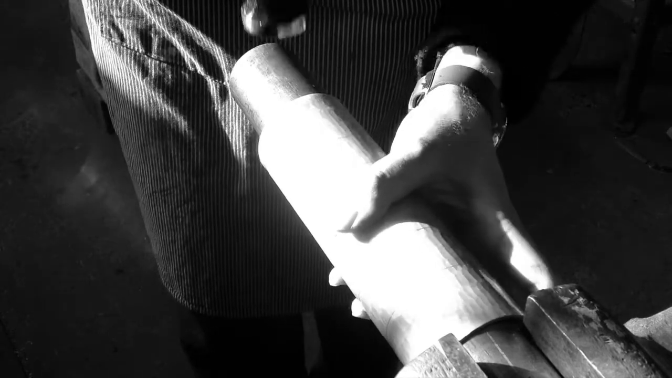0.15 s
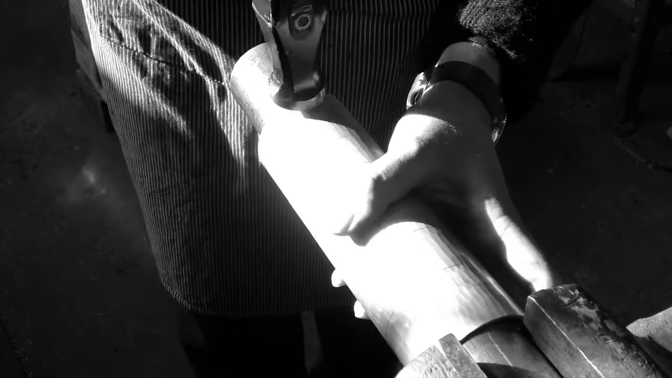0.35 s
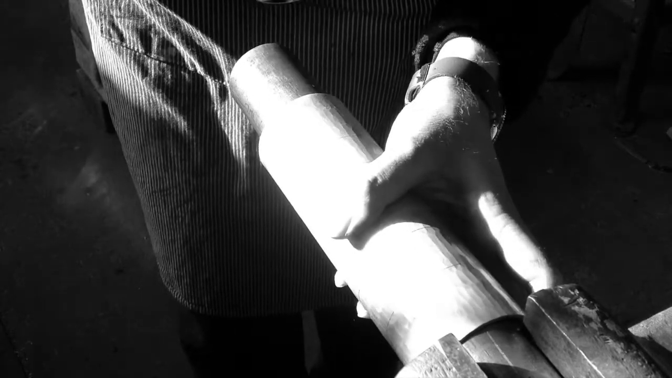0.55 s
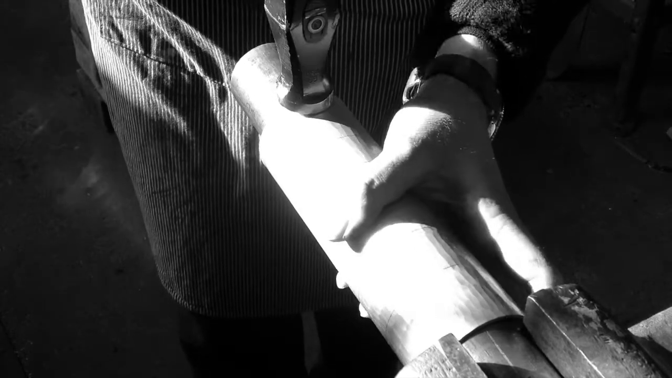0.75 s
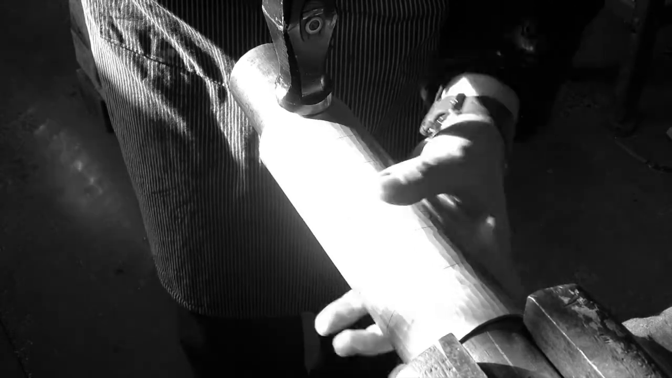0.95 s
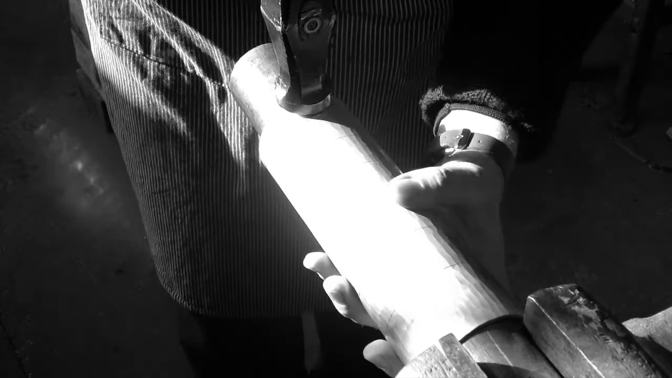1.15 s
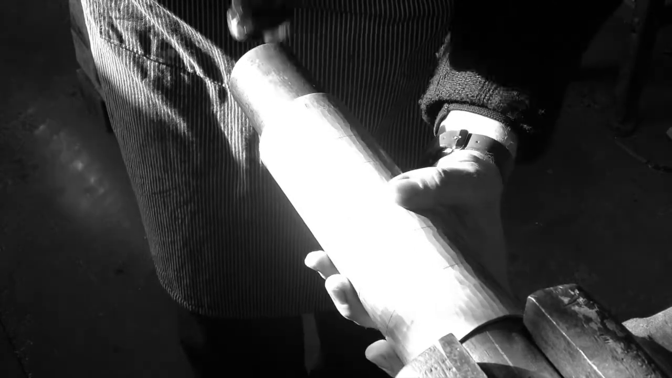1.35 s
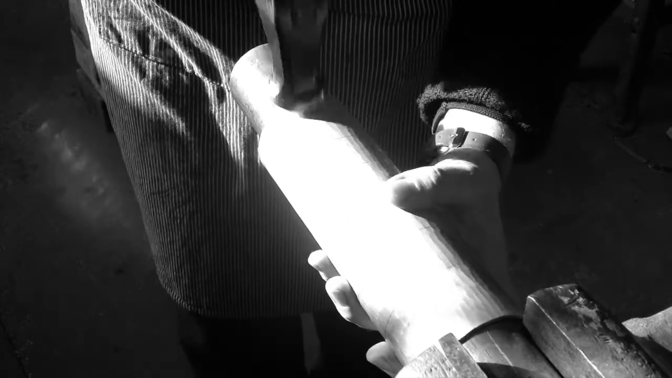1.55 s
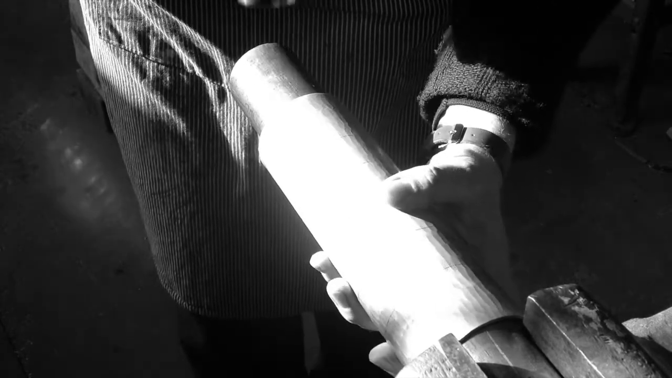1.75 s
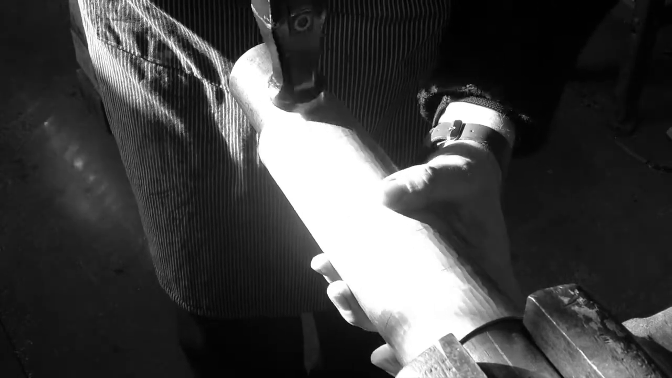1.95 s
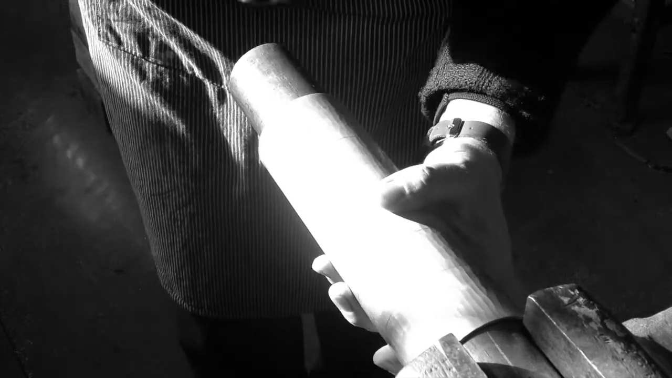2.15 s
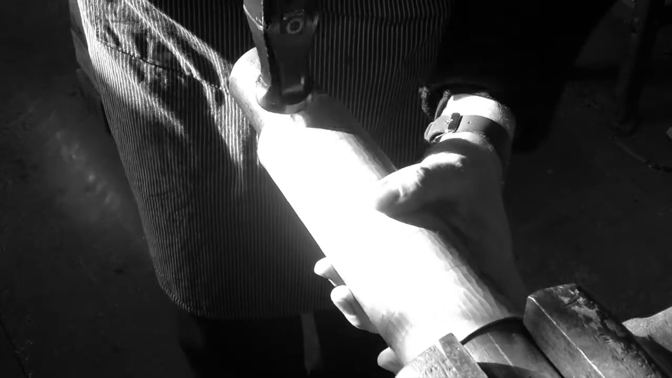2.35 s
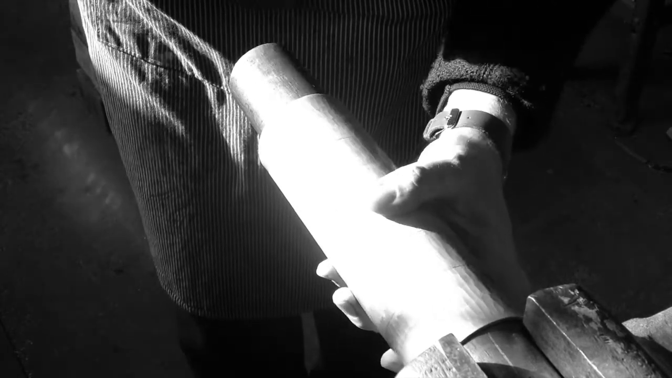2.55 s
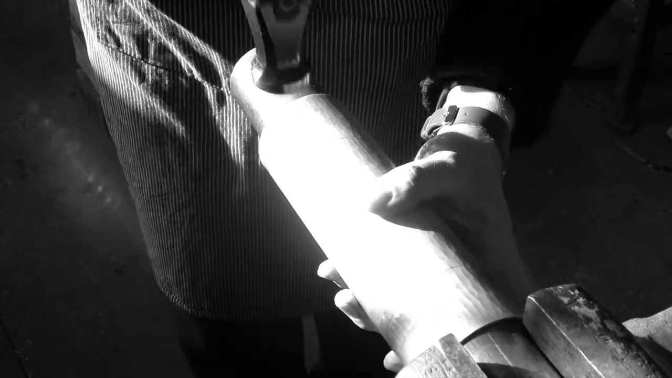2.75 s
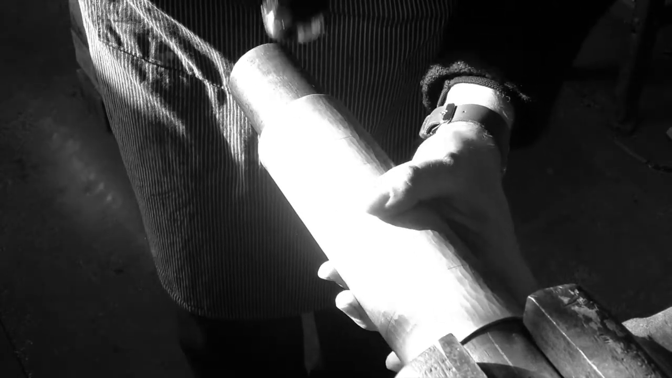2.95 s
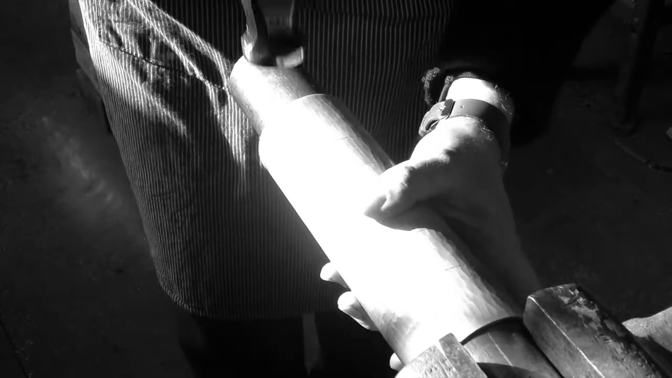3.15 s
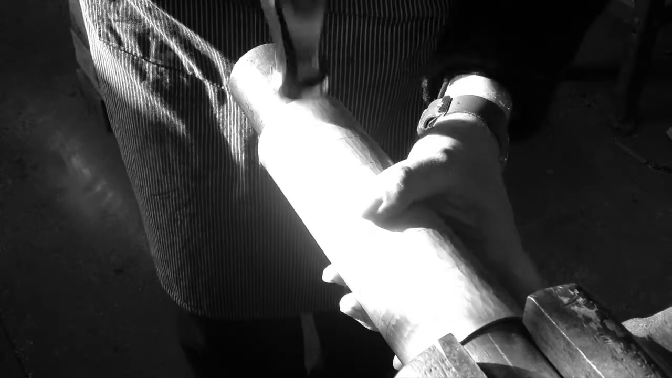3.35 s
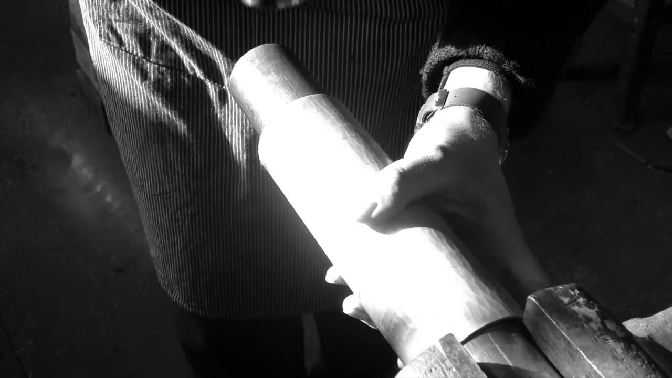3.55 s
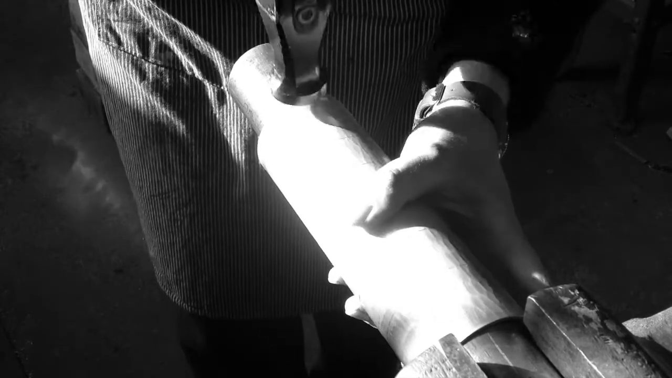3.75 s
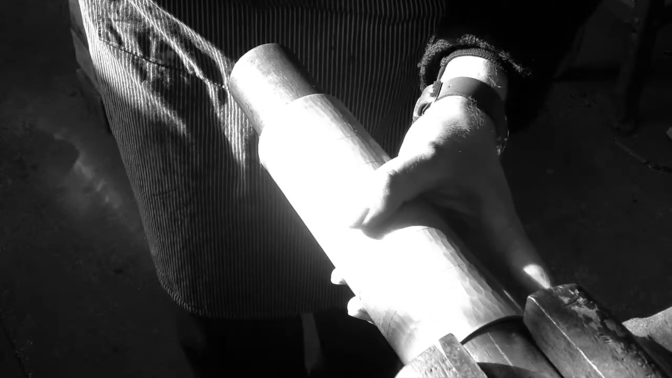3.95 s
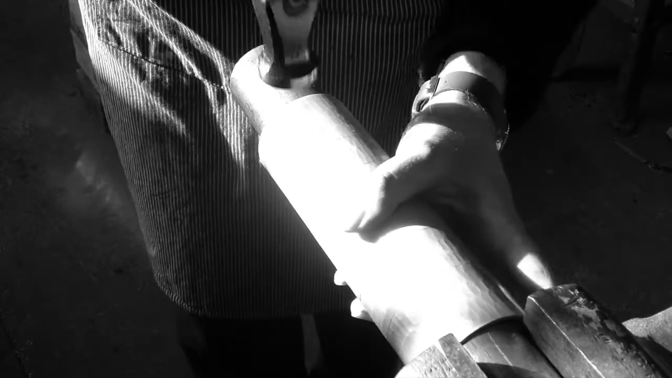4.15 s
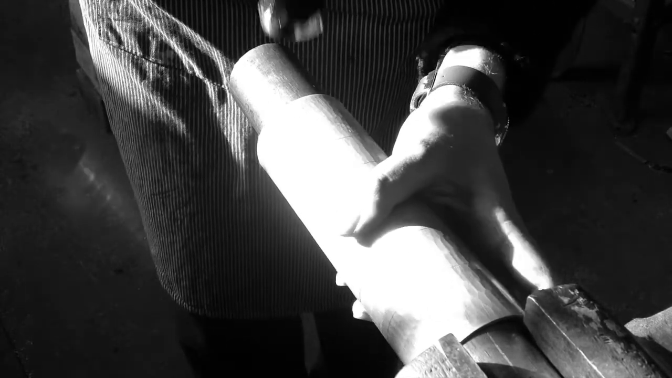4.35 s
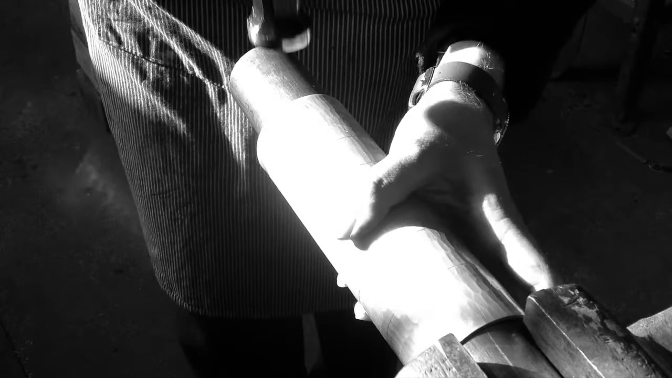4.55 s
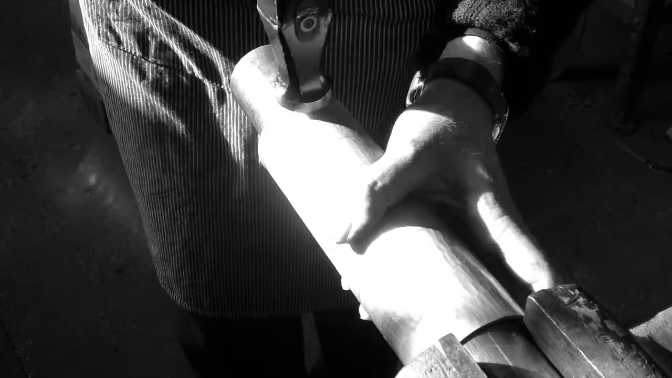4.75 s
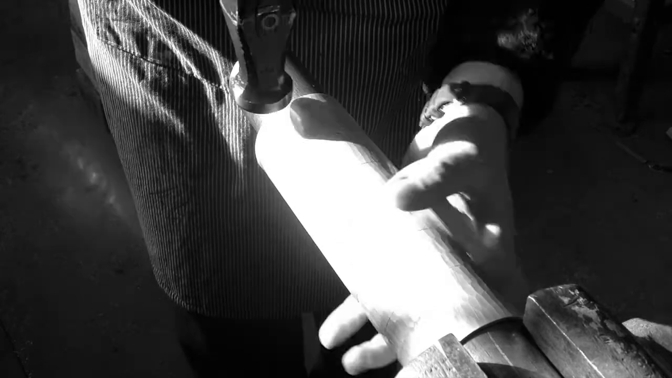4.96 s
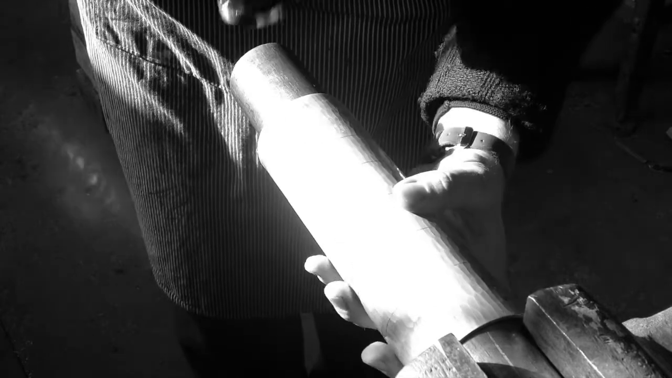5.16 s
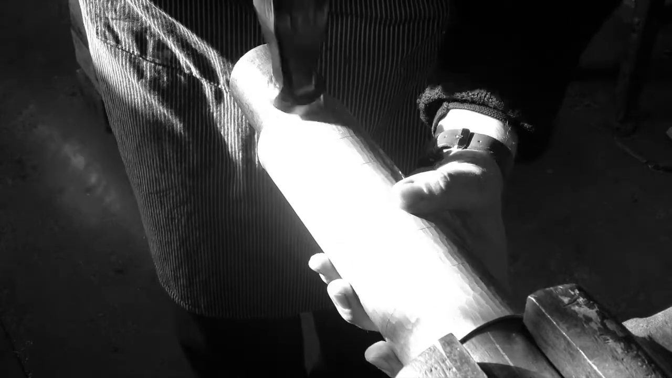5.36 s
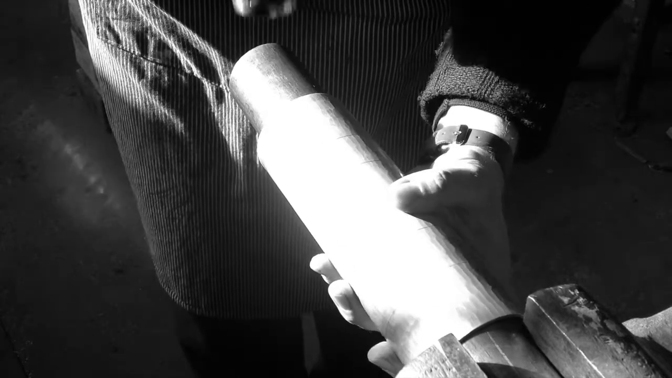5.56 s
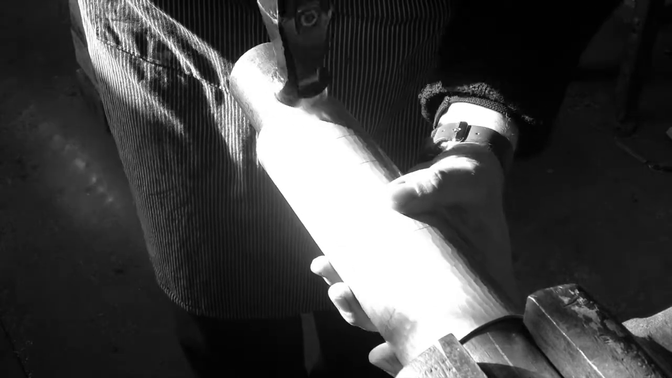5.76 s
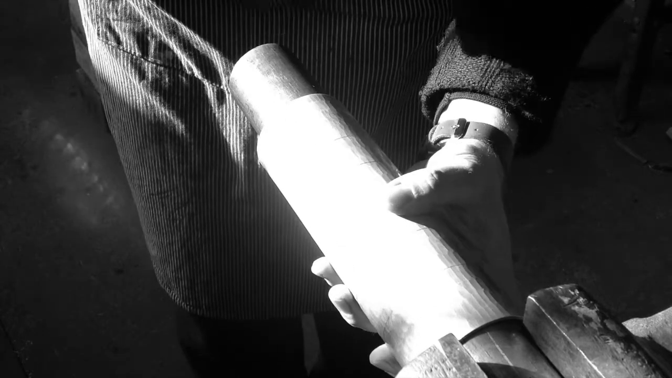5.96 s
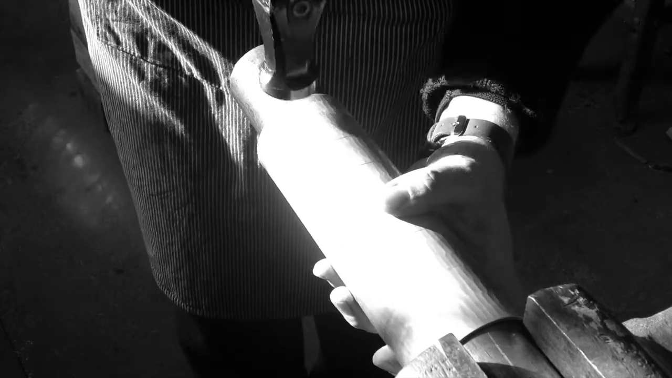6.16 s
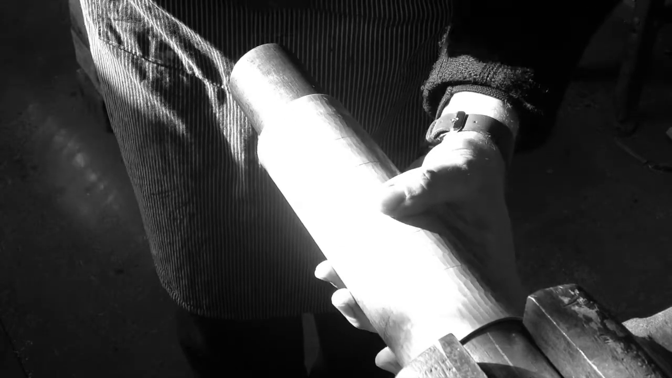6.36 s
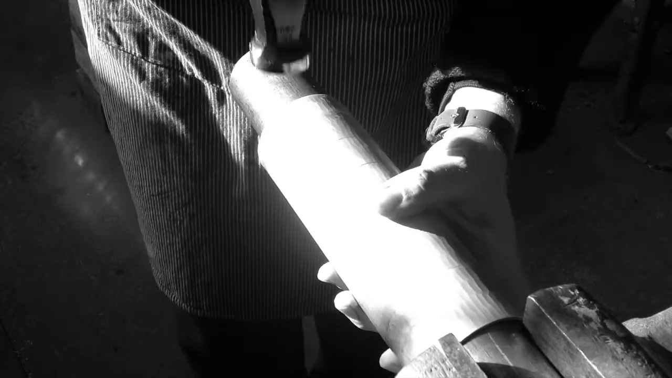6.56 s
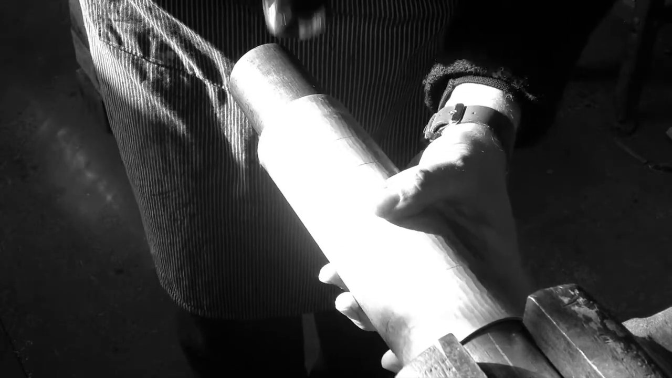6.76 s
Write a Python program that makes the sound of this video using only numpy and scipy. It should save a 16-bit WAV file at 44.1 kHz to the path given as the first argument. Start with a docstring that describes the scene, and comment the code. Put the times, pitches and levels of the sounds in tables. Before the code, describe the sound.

In a small workshop, a smith hits sheet copper against steel in an even rhythm. Three blows, a pause of nearly a second with a soft knock, a long run of ten blows, a shorter pause with faint dull bumps, then five more. The microphone is near; blows are hard, bright and slightly compressed, with short room echoes and a beating metallic ring.

```python
"""Hammering a copper vase

A smith raises the neck of a copper vase over a steel stake, nearly three blows a second, in a small workshop.
Each blow is a crack of shaped noise, a thud of one filtered push, and a clang and ring of dying sine waves.
Twice the hammering pauses while the hand turns the vase, which knocks softly on the stake.
Echoes made of shaped noise answer every contact, and a faint hiss of room air lies under it all."""
import sys
import numpy as np
from scipy import signal
from scipy.fft import rfft, irfft, next_fast_len
from scipy.io import wavfile

SR = 44100
rng = np.random.default_rng(int(sys.argv[2]) if len(sys.argv) > 2 else 0)


def generate_wav(signal):
    """Clip the signal to [-1, 1] and save it as 16-bit WAV at the path in sys.argv[1]."""
    frames = np.transpose(np.atleast_2d(signal))
    scaled = np.clip(frames, -1, 1) * 32767
    pcm = np.round(scaled).astype(np.int16)
    wavfile.write(sys.argv[1], SR, pcm)


N = 303849  # length in samples


def undb(db):
    """Turn decibels into a gain."""
    return 10 ** (np.asarray(db) / 20)


def fade(t, t60):
    """Die away exponentially, 60 dB down after t60 seconds."""
    return np.exp(-np.log(1000) * t / t60)


def colour(x, points):
    """Shape the spectrum of x by (Hz, dB) points without any sound ahead of time, so attacks stay sharp."""
    size = next_fast_len(len(x) + SR // 10, real=True) * 2
    hz, db = np.transpose(points)[:2]
    bins = np.fft.rfftfreq(size, 1 / SR)
    gain_db = np.interp(np.log(bins + 1), np.log(hz), db)
    # folding the cepstrum (the spectrum of the log gain) gives a minimum-phase filter
    cepstrum = irfft(np.log(undb(gain_db)))
    cepstrum[1:size // 2] *= 2
    cepstrum[size // 2 + 1:] = 0
    response = np.exp(rfft(cepstrum))
    return irfft(rfft(x, size) * response)[:len(x)]


def lowpass(x, hz, order=2):
    """Smoothly remove what lies above hz."""
    sos = signal.butter(order, min(hz, SR / 2 - 1), fs=SR, output="sos")
    return signal.sosfilt(sos, x)


def add(track, s, sound):
    """Mix a sound into the track at time s in seconds."""
    start = max(int(s * SR), 0)
    part = sound[:len(track) - start]
    track[start:start + len(part)] += part


def air():
    """Still air of the workshop: faint noise that swells a little at random."""
    # Tone of the air. Each row: frequency in Hz, gain in dB.
    air_tone = [(25, -80), (70, -86), (130, -58.5), (200, -55), (400, -59.5), (1000, -61), (2500, -69.5),
                (5000, -74), (10000, -75), (15000, -88)]
    swell = np.interp(np.arange(N), np.linspace(0, N, 30), rng.standard_normal(30))
    return colour(rng.standard_normal(N), air_tone) * undb(.8 * swell)


def crackle(t, hold, t60):
    """Crack of the sheet: modes too dense to tell apart, driven during the contact, then dying fast."""
    # Dense upper modes of the copper sheet. Each row: frequency in Hz, gain in dB.
    crack_tone = [(40, -59), (100, -37), (200, -16.5), (300, -21), (750, -16), (1050, -17.5), (1450, -14.5),
                  (1850, -13.5), (2600, -8.5), (3200, -14.5), (4500, -9.5), (5900, -9.5), (6700, -13.5),
                  (7400, -7), (8200, -13), (12000, -14), (12600, -18), (15000, -20)]
    envelope = np.clip(t / 0.00014, 0, 1) * fade(np.maximum(t - hold, 0), t60)
    size = SR // 8
    spectrum = rfft(rng.standard_normal(size) * envelope[:size])
    # make all frequencies equally strong, keeping only their random timing
    even = irfft(spectrum / np.abs(spectrum), size) * np.sqrt(np.sum(envelope ** 2))
    onset = np.clip(t[:size] / 0.00034, 0, 1)
    closing = np.clip((.07 - t[:size]) / 0.096, 0, 1)  # silent from 0.07 s on
    return np.pad(colour(even * onset * closing, crack_tone), (0, len(t) - size))


def push_thud(t, thud_db):
    """Thud: the blow's momentum goes into the stake as a single push, a filtered impulse."""
    # Dull push through the stake, before the bass change below. Each row: frequency in Hz, gain in dB.
    thud_tone = [(25, -32), (60, -22), (100, -5.5), (150, 10), (230, 8.5), (400, 2), (800, -23.5),
                 (3000, -53)]
    deep_hz = 120  # deep bass lies below this
    deep_db = -3 + 0.71 * thud_db  # the harder the thud, the more deep bass it carries
    push = [(hz, db + deep_db * (hz < deep_hz)) for hz, db in thud_tone]
    thud = np.zeros(len(t))
    add(thud, 0, undb(thud_db) * colour(signal.unit_impulse(SR // 20), push))
    return thud


def modes(table, t, detune, scatter_db):
    """Decaying sines; each blow lands on a new spot, which shifts their pitch and strength."""
    out = np.zeros(len(t))
    draws = rng.standard_normal((len(table), 3))
    for (hz, db, t60), (shift, size, phase) in zip(table, draws):
        u = t[:int(2 * t60 * SR)]
        cycles = hz * (1 + detune * shift) * u + phase
        level = undb(db + scatter_db * size)
        out[:len(u)] += level * fade(u, t60) * np.sin(2 * np.pi * cycles)
    return out


def wall_clang(t, ping_db):
    """Clang: quickly damped modes of the copper wall and the hammer head."""
    # Modes of wall and hammer, before ping and scatter.
    # Each row: frequency in Hz, level in dB, time to fall 60 dB in seconds.
    clang_modes = [(394.5, -39, 0.22), (703, -36, 0.11), (792.4, -39, 0.16), (869, -45.5, 0.1),
                   (1346.7, -27, .09), (2340, -27, 0.073), (2639, -29.5, 0.053), (3905, -24, 0.095),
                   (4988, -16, 0.051), (5126, -29, 0.057), (5450, -35.5, .06), (6070, -22.5, 0.041)]
    # the spot struck matters mostly for the bright ping near 5 kHz
    wall = [(hz, db + ping_db * (4900 < hz < 5100), t60) for hz, db, t60 in clang_modes]
    return modes(wall, t, detune=.005, scatter_db=1.5)


def stake_ring(t, ring_db, free_db, whistle_db, stretch):
    """Ring: long modes of the steel stake with the vase on it, close pairs beating."""
    # Modes of stake and vase, before the changes below.
    # Each row: frequency in Hz, level in dB, time to fall 60 dB in seconds.
    ring_modes = [(2292, -44, .35), (2316, -39, .45), (3671, -62, .9), (4000, -30, .26), (4013, -43, .55),
                  (4023, -41, .55), (6182, -38, .33), (6202, -31.5, .38), (6944, -63, .8), (7564, -37, .52),
                  (7588, -41, .25), (9540, -52, .52), (10070, -51, .22), (10982, -65, 1.7),
                  (11654, -41, .47), (11668, -45, .3)]
    hz, db, t60 = np.transpose(ring_modes)
    # where the copper sits loosely on the steel, the bell-like modes near 7.6 kHz ring louder and longer
    loose = undb(.35 * free_db * (abs(hz - 7570) < 100))
    whistle = whistle_db * (abs(hz - 10982) < 100)
    held = np.where(hz > 10500, stretch, 1)  # only the highest modes are stretched
    steel = np.transpose([hz, db + 20 * np.log10(loose) + whistle, t60 * loose * held])
    return undb(ring_db) * modes(steel, t, detune=.00015, scatter_db=2.2)


def strike(thud_db, ping_db, ring_db, bright_db, free_db, whistle_db, stretch=1):
    """One contact with the vase: its broad crack, its thud, its short clang and its long ring."""
    t = np.arange(SR) / SR
    crack = crackle(t, hold=0.0034, t60=0.047)  # both in seconds
    treble = crack - lowpass(crack, 9400, order=1)
    crack = crack + (undb(bright_db) - 1) * treble
    thud = push_thud(t, thud_db)
    clang = wall_clang(t, ping_db)
    ring = stake_ring(t, ring_db, free_db, whistle_db, stretch)
    return crack, thud, clang, ring


def blow(s, thud_db, ping_db, wait_s):
    """A hammer blow: its brightness and ring follow from the thud and from how the hand holds the vase."""
    # How loosely the hand lets the vase sit on the stake. Each row: time in seconds, looseness in dB.
    seating = [(0, -8), (.69, -4), (1.95, 0), (3.74, 4), (4.09, -6), (5.39, -0.5), (6.48, -6)]
    # Change in the thin 11 kHz whistle of the ring. Each row: time in seconds, change in dB.
    whistle = [(.69, 7), (2.68, -9), (3.4, 8), (4.78, -3.5), (5.76, -7.5)]
    seating_db = np.interp(s, *np.transpose(seating))
    whistle_db = np.interp(s, *np.transpose(whistle))
    pause_s = .5  # a longer wait than this means that the hand lets go to turn the vase
    return strike(thud_db, ping_db,
                  # the whole ring swells a little with the whistle
                  ring_db=-0.12 + 0.082 * whistle_db,
                  # a slammed vase cracks a little brighter
                  bright_db=0.86 + 0.1 * thud_db,
                  # it also rebounds and sits more loosely
                  free_db=seating_db + 0.82 * thud_db,
                  whistle_db=whistle_db,
                  # let go, the highest modes take longer to die
                  stretch=1.5 if wait_s > pause_s else 1)


def workshop():
    """Room response: early echoes off floor, bench and body, then a tail that fades at its own pace per band."""
    # Reverberation of the workshop. Each row: frequency in Hz, gain in dB, time to fall 60 dB in seconds.
    room_tail = [(60, -42.5, 0.13), (127, -32.5, 0.76), (185, -34, 0.85), (278, -26.5, 0.88),
                 (450, -29.5, 0.69), (1013, -29.5, 0.57), (2260, -36.5, 0.53), (4800, -37, .44),
                 (8800, -36.5, 0.33), (13600, -36.5, 0.26)]
    size = 3 * SR // 4
    t = np.arange(size) / SR
    hz, db, t60 = np.transpose(room_tail)
    noise = rfft(rng.standard_normal(size))
    bins = np.fft.rfftfreq(size, 1 / SR)
    edges = np.geomspace(42, SR / 2, 21)  # band edges in Hz
    tail = 0
    for lo, hi in zip(edges, edges[1:]):
        middle = np.log(lo * hi) / 2  # log of the band's middle frequency
        band = irfft(noise * ((bins >= lo) & (bins < hi)), size)
        level = undb(np.interp(middle, np.log(hz), db))
        tail = tail + band * level * fade(t, np.interp(middle, np.log(hz), t60))
    # sparse random clicks stand for the separate early echoes
    echoes = rng.standard_normal(size) * (rng.random(size) < .03) * fade(t, 0.15)
    early = colour(echoes, [(70, -27), (200, -2), (750, -1.0), (1500, -16.5), (12000, -19.0)])
    return (tail + early) * np.clip((t - .003) / 0.0052, 0, 1)  # nothing returns in the first 3 ms


def in_room(crack, thud, clang, ring, rooms):
    """Direct sound plus echoes, whose pattern changes with each contact as the smith and the vase move."""
    stance = rng.standard_normal(len(rooms)) + .6
    response = stance @ rooms / np.linalg.norm(stance)  # a new mix of the room responses
    # the crack spreads everywhere; thud, clang and ring are strongest close to the vase
    spread = crack + undb(-13.5) * thud + undb(-8) * clang + undb(-7) * ring
    echoes = signal.fftconvolve(spread[:len(response)], response)[:len(crack)]
    return crack + thud + clang + ring + echoes


def knock(dull_hz):
    """A slow, soft contact rings more than it cracks and leaves out the treble."""
    crack, thud, clang, ring = strike(thud_db=2, ping_db=-6, ring_db=8, bright_db=0, free_db=0, whistle_db=0)
    crack = undb(-4.5) * lowpass(crack, dull_hz)
    clang = undb(8.5) * lowpass(clang, dull_hz, order=4)
    ring = lowpass(ring, dull_hz, order=10)
    return crack, thud, clang, ring


def scene():
    """Room air, hammer blows and soft knocks in the workshop."""
    # Hammer blows; a vase that is not lying flat is slammed onto the stake and thuds.
    # Each row: start in seconds, force in dB, thud in dB, 5 kHz ping in dB.
    blows = [(0.0037, 1, -1.5, -4.5), (0.3501, -2, 12.5, -2.5), (0.6895, 1, -5, 2), (1.5876, 0.4, -4, -21),
             (1.9534, 1.5, .2, -9), (2.318, -0.6, 0.5, -2), (2.6792, -0.6, -2, -3.5), (3.0364, -.5, -2, 5),
             (3.399, 0.44, -3, -7), (3.7414, -0.8, 0.5, 2.5), (4.092, 0.6, 8, 5), (4.44, 0.44, -1, 1),
             (4.7774, 0.4, 6.5, 1), (5.394, 0, 0.5, -0.5), (5.7587, 0, -1, 2.5), (6.114, -0.5, -1.5, 1),
             (6.4774, 0, -0.5, 1), (6.8406, 2, -4, 0)]
    # The vase knocks on the stake as it is turned.
    # Each row: start in seconds, level in dB, frequency in Hz above which it is dull.
    knocks = [(1.148, -33, 2870), (1.513, -47, 1500), (5.182, -37, 710), (5.198, -43.5, 900),
              (5.236, -45, 2000)]
    out = air()
    rooms = np.array([workshop() for _ in range(5)])
    waits = np.diff([row[0] for row in blows], append=N / SR)  # seconds until the next blow
    for (s, force_db, thud_db, ping_db), wait_s in zip(blows, waits):
        hit = blow(s, thud_db, ping_db, wait_s)
        add(out, s, undb(force_db) * in_room(*hit, rooms))
    for s, db, dull_hz in knocks:
        add(out, s, undb(db) * in_room(*knock(dull_hz), rooms))
    return out[None]


def record(dry):
    """The microphone rounds the highest peaks; a steep filter cuts the top."""
    ceiling = .66  # the rounded wave approaches this amplitude
    top_hz = 15350
    rounded = ceiling * np.tanh(dry / ceiling)
    return signal.sosfilt(signal.ellip(10, .2, 70, top_hz, fs=SR, output="sos"), rounded)


dry = scene()
out = record(dry)
generate_wav(out)
```